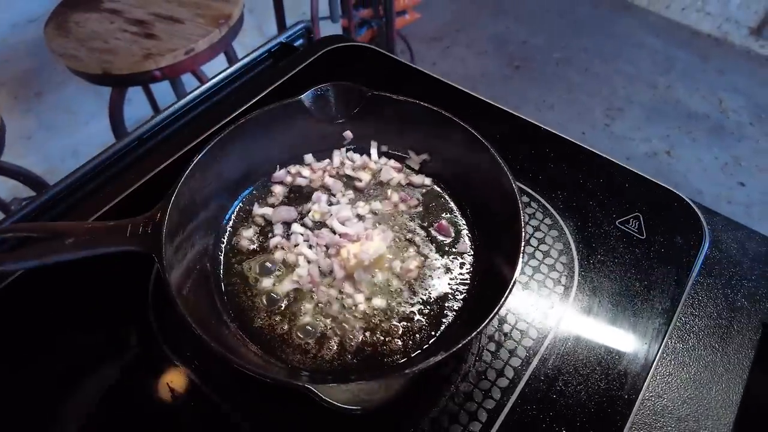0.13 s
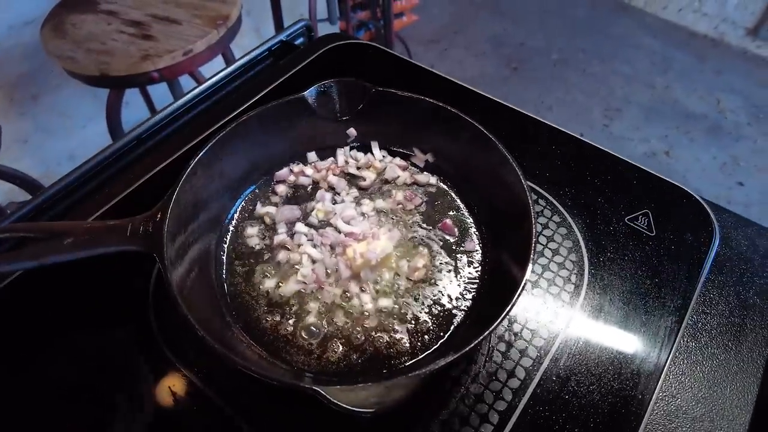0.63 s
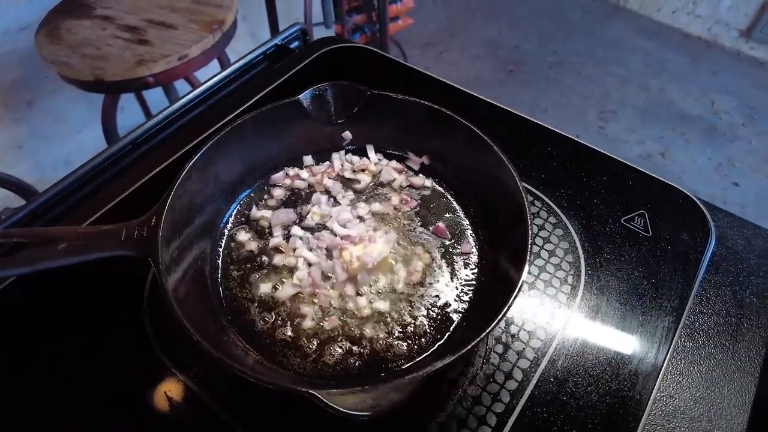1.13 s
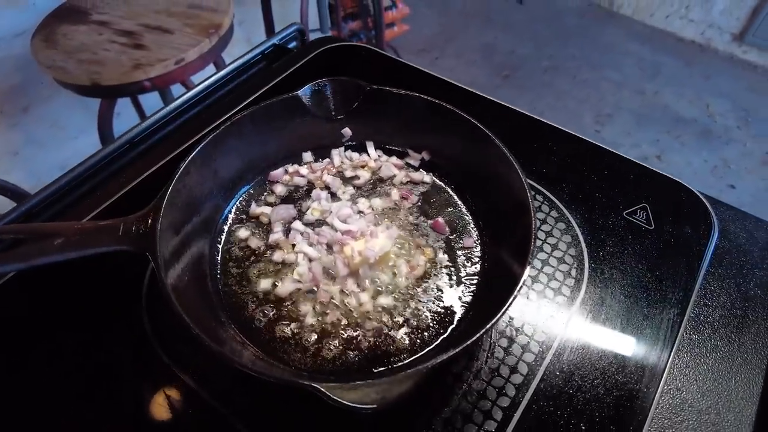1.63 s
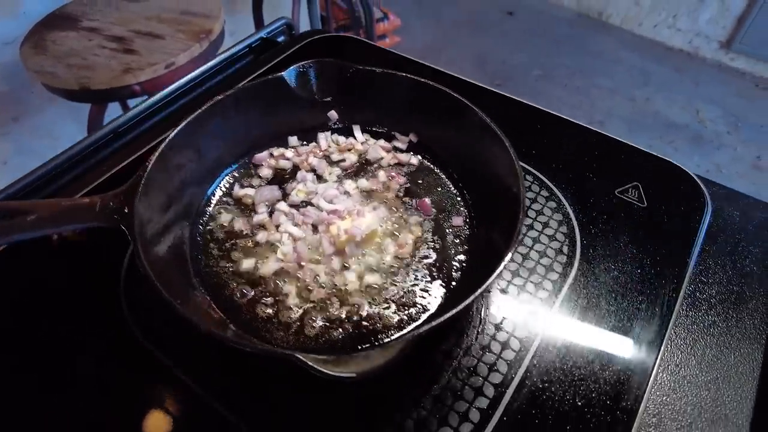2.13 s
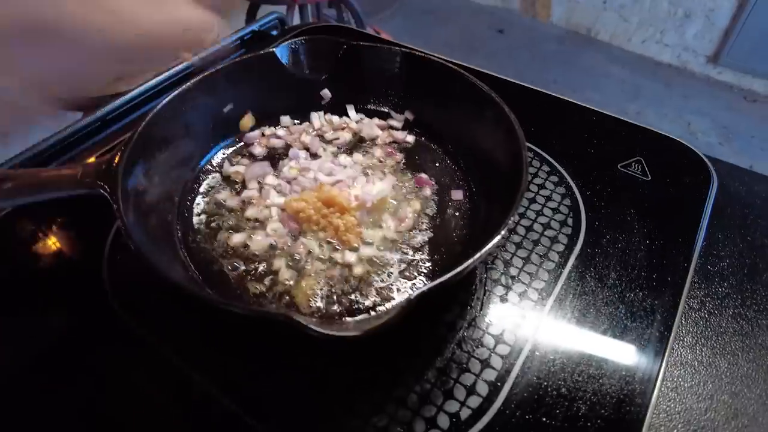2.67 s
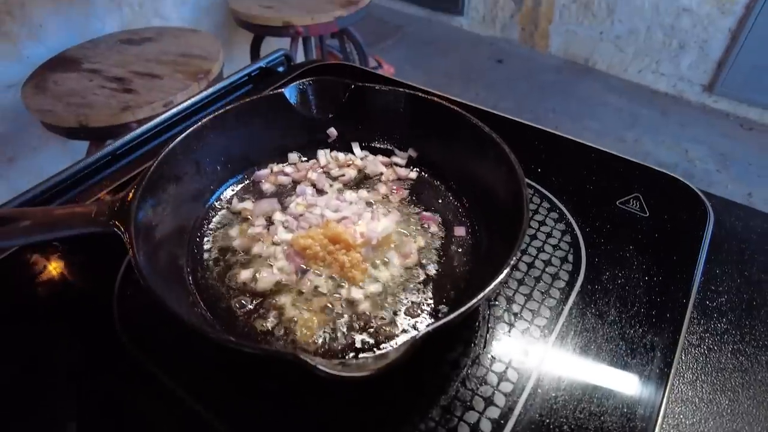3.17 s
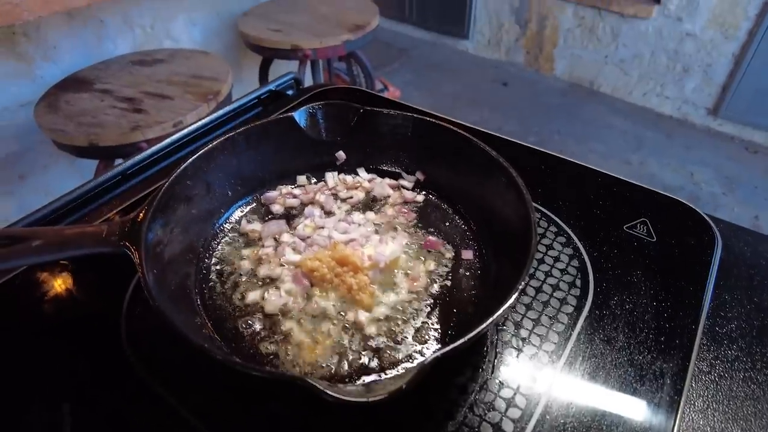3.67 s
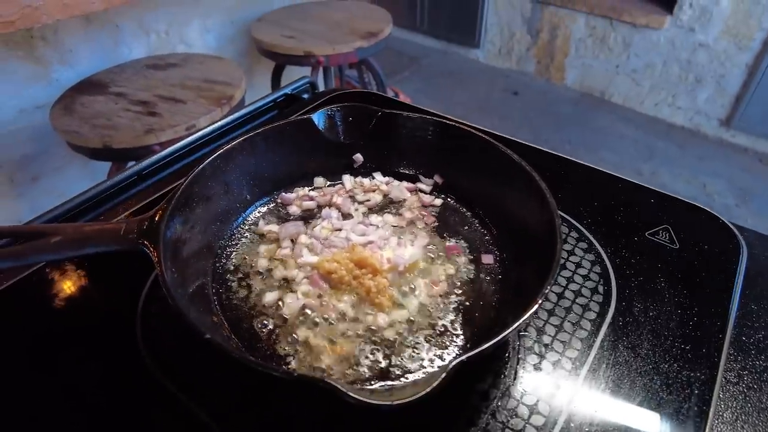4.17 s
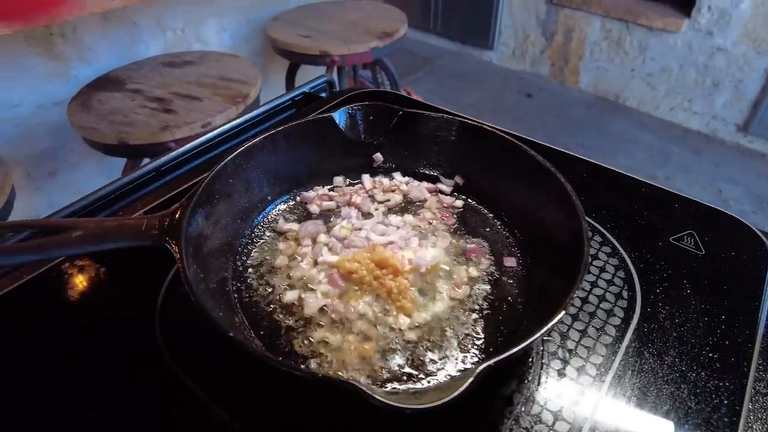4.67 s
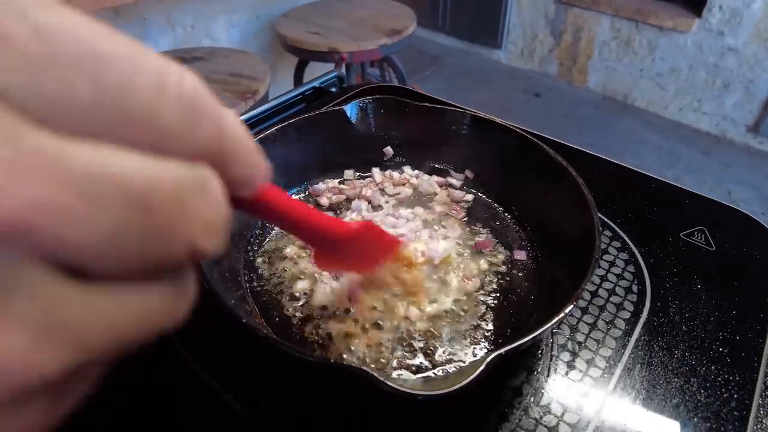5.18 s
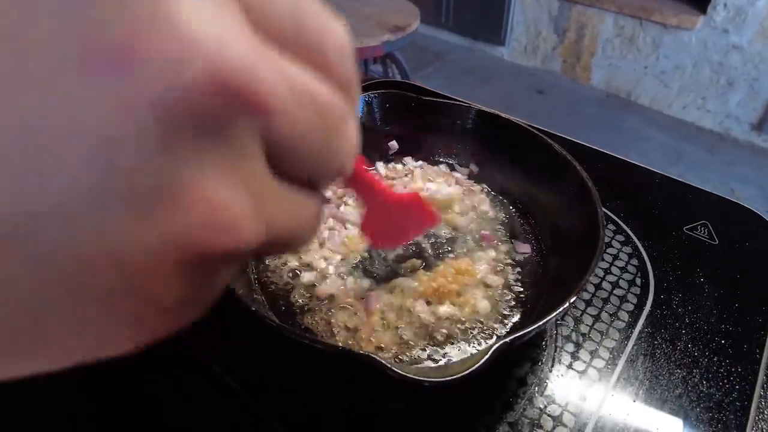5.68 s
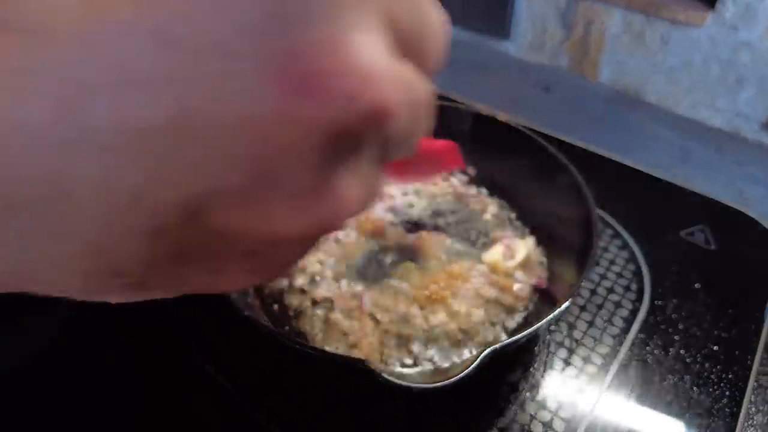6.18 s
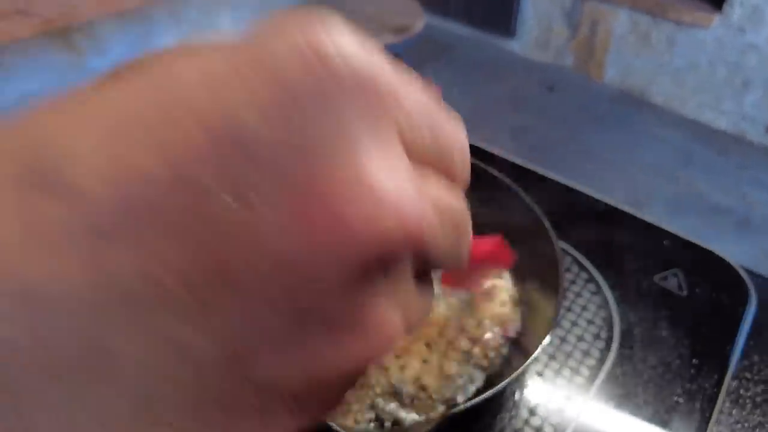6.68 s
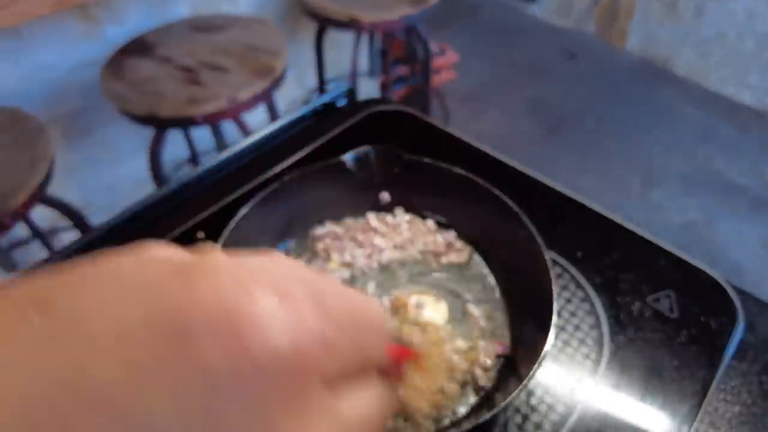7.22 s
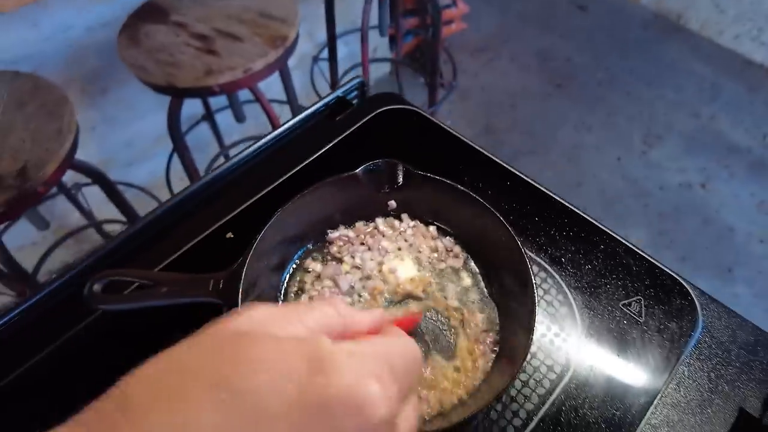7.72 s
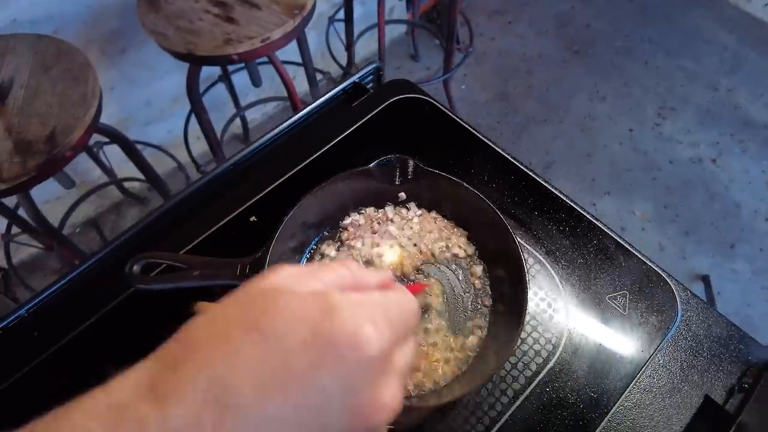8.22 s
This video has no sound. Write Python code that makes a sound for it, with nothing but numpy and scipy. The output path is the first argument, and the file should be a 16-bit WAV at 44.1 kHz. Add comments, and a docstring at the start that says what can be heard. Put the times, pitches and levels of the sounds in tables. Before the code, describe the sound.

Close frying in an iron skillet: fine bubbling, snaps and steady hiss, gentle at first, then much stronger from about three seconds. A small glass dish clinks as it is picked up early, taps lightly, then slides and clatters onto the counter mid-way. Loud spits pop throughout. A faint cooktop fan hums underneath. One nearby microphone, fairly dry, open space.

```python
"""At a kitchen cooktop, shallots and garlic fry in butter in an iron skillet, heard close by one microphone.
Steam bubbles ring, snap and hiss through the pan's resonances; the fizz swells with garlic and stirring,
and bigger bubbles spit. A small glass dish is picked up, slid and put down: knocks ring the counter and
the air under the dish, while clinks ring its glass. A fan makes noise and motor tones, and a faint far
tone sounds once."""
import sys
import numpy as np
from scipy import signal
from scipy.fft import rfft, irfft, next_fast_len
from scipy.io import wavfile
from scipy.ndimage import uniform_filter1d, map_coordinates

SR = 44100
rng = np.random.default_rng(int(sys.argv[2]) if len(sys.argv) > 2 else 0)


def elevation(decibels):
    """Turn decibel levels (scalar or array-like) into linear amplitude ratios."""
    levels = np.asarray(decibels, float)
    return 10 ** (levels / 20)


def unload_wav(signal):
    """Save mono or channel-first audio to the path in sys.argv[1] as 16-bit WAV at rate SR, clipped to [-1, 1]."""
    wavfile.write(
        sys.argv[1],
        SR,
        np.round(np.clip(np.atleast_2d(signal).T, -1, 1) * 32767).astype(np.int16),
    )


N = 367794
T = np.arange(N) / SR  # time of each sample, s

# ways the counter top rings, the first nine for the boom, the rest for the clack:
# usual pitch_hz, relative level_db, t60_s (time to die by 60 dB)
COUNTER_TOP = [(325, 10, 0.038), (534, 7.5, 0.022), (797, 4, 0.011), (986, 1.5, 0.017), (1077, -1, 0.021),
               (1250, 5.5, 0.0099), (1594, 11.5, 0.0059), (2350, 13.5, 0.0074), (2700, 4, 0.02),
               (3410, 1.5, 0.026), (3680, 10, 0.022), (4150, 5.5, 0.018), (5440, 6.5, 0.016),
               (6940, -1, 0.033), (7500, 6, 0.025), (7600, -1, 0.049)]
# the sliding dish; the air under it sings lower as the gap changes: time_s, pitch_hz, level_db
SLIDE_PATH = [(3.27, 1800, -56), (3.319, 1826, -54), (3.5, 1583, -46), (3.58, 1203, -52),
              (3.66, 1042, -45.5), (3.8, 1000, -48), (3.85, 1010, -68)]
SLIDE_START_S, SLIDE_END_S = SLIDE_PATH[0][0], SLIDE_PATH[-1][0]


def response(points, boosts=()):
    """Causal filter for (Hz, dB) points and (Hz, width, dB) humps."""
    hz = np.fft.rfftfreq(4096, 1 / SR) + 1
    f, db = np.transpose(points)
    db = np.interp(np.log(hz), np.log(f), db)
    db = db + sum(b / (1 + (2 * (hz - c) / w) ** 2) for c, w, b in boosts)
    # folding the cepstrum forward makes the filter act only after its input
    cepstrum = irfft(np.log(elevation(db)))
    cepstrum[1:2048] *= 2
    cepstrum[2049:] = 0
    return irfft(np.exp(rfft(cepstrum)))


def level(x, db):
    """Scale to an rms level."""
    return x * elevation(db) / np.sqrt(np.mean(x ** 2))


def walk(rate):
    """Random levels held 1 / rate s and slewed twice; spread near 1."""
    hold = int(SR / rate)
    steps = np.repeat(rng.standard_normal(N // hold + 1), hold)
    return 1.3 * uniform_filter1d(uniform_filter1d(steps, hold), hold)[:N]


def add(out, s, hz, db, t60, phase=0, rise_s=1e-4):
    """Add a dying sine from time s on; contact takes rise_s."""
    i = int(s * SR)
    t = T[:min(int(t60 * SR), N - i)]
    envelope = (1 - np.exp(-t / rise_s)) * elevation(db - 60 * t / t60)
    out[i:i + len(t)] += envelope * np.sin(2 * np.pi * hz * t + phase)


def bursts(per_s, spread_db):
    """Clicks at random moments with random sizes and signs; power 1."""
    where, size, sign = rng.random((int(per_s * N / SR), 3)).T
    sizes = elevation(-spread_db * np.log(size + .02)) * np.sign(sign - .5)
    return level(np.bincount((where * N).astype(int), sizes, N), 0)


def frying():
    """Bubbles of every size ring a few cycles; snaps and steam hiss join them, all coloured by the pan."""
    # colour of the fry: pitch_hz, relative level_db
    fry_colour = [(350, -23), (600, -22.5), (880, -9.5), (1310, -13), (2010, -10), (2570, -4), (3780, -2),
                  (5950, -2), (7600, -9.5), (8800, -7.5), (13400, -4.5), (16000, -9)]
    # hollow of the pan: pitch_hz, width_hz, shallots_boost_db, garlic_heap_boost_db, stirred_boost_db
    pan_hollow = [(970, 280, -4.5, 3.5, 0), (1813, 290, 6.5, 7.5, 9.5), (2564, 260, 2.5, -0.5, 4),
                  (3850, 330, 2.5, 4.5, 4.5), (4690, 230, 1, 5, -2), (5940, 430, 3, 1, 0.5),
                  (7620, 630, 2.5, 5, 4), (11070, 210, 4, 7.5, 3.5), (8470, 360, -3, -5, -2.5)]
    fizz_db = vigour()
    over_calm_db = fizz_db + 50  # the pan left alone fizzes at -50 dB
    # large bubbles follow the vigour steeply, fine spray weakly
    large_db = -60 + 1.237 * over_calm_db
    spray_db = -54 + 0.57 * over_calm_db
    garlic_s, garlic_rise_s, garlic_db = 1.8, 0.77, 2.5  # wet garlic adds large bubbles
    large_db = large_db + garlic_db * np.clip((T - garlic_s) / garlic_rise_s, 0, 1)
    surge_db = 0.52 * walk(25) + 0.74 * walk(90)  # bubbles come in flurries

    # fine spray snaps apart from the coarser spatter
    spatter, spray = bursts(300, spread_db=1.5), bursts(300, spread_db=24.0)
    snaps = uniform_filter1d(spatter, size=5) * 2 + spray - uniform_filter1d(spray, size=5)
    bubbles = 0
    for hz in 900 * 2 ** np.arange(0, 4.2, 1 / 6):
        pole = np.exp(-hz / (3.0 * SR))  # a handful of cycles
        ringing = [1, -2 * pole * np.cos(2 * np.pi * hz / SR), pole ** 2]
        swelling = [1, -1.6 * np.cos(2 * np.pi * hz / SR), .64]  # the ring swells in
        ring = signal.lfilter([1], ringing, bursts(.04 * hz, spread_db=3.5))
        ring = signal.lfilter([1], swelling, ring)
        bubbles = bubbles + level(ring, 10 * np.log10(hz)) * elevation(1.6 * walk(4.08))  # each size comes and goes
    busy_db = fizz_db + 49.0  # a fierce fry blurs single bursts into hiss
    hiss = level(rng.standard_normal(N), -2.25) * elevation(0.46 * busy_db)
    raw = level(bubbles, 0) + level(snaps, -4.5) + hiss
    raw = raw / np.sqrt(uniform_filter1d(raw ** 2, SR // 2))
    lag = SR * (0.00086 + .00006 * walk(1.456))  # echo off the pan wall; the microphone sways
    raw = raw + 0.12 * np.interp(np.arange(N) - lag, np.arange(N), raw)

    # split into large bubbles, middle fizz and fine spray
    size = next_fast_len(N)
    spectrum = rfft(raw * elevation(surge_db * (1 - 0.057 * busy_db)), size)
    hz = np.fft.rfftfreq(size, 1 / SR)
    low = 1 / (1 + (hz / 3400) ** 6)
    high = 1 / (1 + (8300 / (hz + 1)) ** 12)
    bands = [(1 - low - high, fizz_db), (low, large_db), (high, spray_db)]
    # the load of the pan changes: garlic heaped, then stirred; each change takes reshape_s
    heaped_s, stirred_s, reshape_s = 3.36, 5.63, 0.57
    heaped, stirred = (np.clip((T - s) / reshape_s + .5, 0, 1) for s in (heaped_s, stirred_s))
    out = 0
    for k, share_now in enumerate((1 - heaped, heaped - stirred, stirred)):
        humps = [(c, w, boost[k]) for c, w, *boost in pan_hollow]
        coloured = spectrum * rfft(response(fry_colour, humps), size)
        for band, band_db in bands:
            part = irfft(coloured * band, size)[:N]
            out = out + share_now * level(part, 0) * elevation(band_db)
    return out


def vigour():
    """Level of the fizz in dB, sample by sample, as the frying grows and calms."""
    # vigour of the fry: time_s, level_db
    fry_vigour = [(0, -49.5), (.9, -51), (1.4, -50), (1.8, -51.5), (2.35, -51.5), (2.55, -49), (2.83, -47),
                  (3.3, -42), (3.7, -39.5), (4.4, -42), (4.7, -43.5), (5.35, -44), (5.75, -40.5),
                  (6.7, -40), (7.2, -41), (7.34, -42.5), (7.375, -38), (7.7, -37), (7.95, -36), (8.34, -40)]
    return np.interp(T, *np.transpose(fry_vigour))


def spits():
    """A big bubble bursts: a short ring, a deeper plop and a millisecond puff of spray."""
    # loud spits: start_s, strength_db, pitch_hz, spray_db
    loud_spits = [(0.0219, -13, 5700, -23.5), (2.612, -24.5, 2500, -40), (2.8953, -23, 4100, -41),
                  (2.9196, -21.5, 4500, -46.5), (3.1185, -17, 5940, -51), (3.3338, -18, 4260, -28),
                  (3.4654, -20, 4130, -31), (3.6152, -18, 5700, -45), (3.6716, -15.5, 4150, -40),
                  (4.2616, -12, 4720, -29), (5.3869, -13, 3880, -24), (5.3882, -20.5, 2550, -28),
                  (6.0474, -19, 3750, -30), (6.1774, -26, 5500, -24), (6.271, -20.5, 3820, -26),
                  (6.4866, -18, 4950, -42.5), (7.0372, -16, 4700, -49), (7.0992, -16, 4650, -49),
                  (7.17, -22, 2900, -42), (7.1962, -9, 4560, -31), (7.5976, -18, 3580, -40.5)]
    out = np.zeros(N)
    t = T[:SR // 200]
    # 130 small spits at random moments follow the fizz
    when, size, pitch, wet = rng.random((130, 4)).T
    s = when * (N / SR - .01)
    fizz_db = vigour()[(s * SR).astype(int)]
    low_hz, high_hz = 2470, 6200
    small_hz = low_hz * (high_hz / low_hz) ** pitch
    small = zip(s, fizz_db + 12.5 - 8 * size, small_hz, fizz_db + 3 + 9.7 * (wet - .5))
    rows = loud_spits + list(small)
    for (s, db, hz, spray_db), noise in zip(rows, rng.standard_normal((len(rows), len(t) + 1))):
        dry = spray_db - db < -24  # a spit with little spray rings longer
        add(out, s, hz, db - 3 * dry, (30 if dry else 12) / hz, rise_s=.0003)
        add(out, s, 0.78 * hz, db - 8 * dry, 6 / hz, rise_s=.00015)
        i = int(s * SR)
        puff = (t / 0.00084) * np.exp(1 - t / 0.00047)
        out[i:i + len(t)] += elevation(spray_db) * np.diff(noise) * puff
    return signal.sosfilt(signal.butter(2, 600, "high", fs=SR, output="sos"), out)  # too small to move bass


def counter():
    """Each knock rings the counter and rebounds weaker, with crunching grit; the dish lands flat with a thud."""
    # knocks on the counter: start_s, strength_db, pitch_hz, clack_db
    knocks = [(0.22, -11.5, 1710, -23), (0.228, -14, 1660, -42), (0.3327, -27.5, 1390, -36),
              (0.389, -31, 1300, -43), (0.4114, -17.5, 1080, -29.5), (0.4122, -19.5, 1704, -52),
              (0.4179, -24.5, 898, -54), (0.452, -28.5, 1550, -39), (.49, -42, 604, -62),
              (1.349, -38, 1370, -45), (1.3522, -28.5, 1410, -39), (1.5597, -22.5, 1340, -42),
              (1.567, -26.5, 1300, -50), (3.235, -20, 1740, -31), (3.245, -20, 1740, -32),
              (3.497, -24, 1610, -45), (3.514, -32, 1600, -35), (3.5255, -30, 1570, -30),
              (3.531, -9.5, 1560, -17.5), (3.5358, -23, 1490, -28), (3.54, -22, 1500, -33),
              (3.5541, -10, 1330, -14.5), (3.561, -13, 1270, -19.5), (3.565, -17, 1290, -16.5),
              (3.567, -22, 1250, -23.5), (3.573, -19, 1160, -28), (3.6901, -17, 1044, -31),
              (3.6944, -10.5, 1008, -27), (3.705, -19, 990, -42), (3.71, -20, 1000, -32),
              (3.73, -15, 990, -29), (3.737, -9, 1170, -25.5), (3.7462, -13, 1060, -31),
              (3.75, -19, 950, -24.5), (3.7539, -28, 900, -23.5), (3.762, -18, 936, -29),
              (3.791, -26, 1016, -40), (4.095, -31.5, 1030, -56)]
    rebound_s, rebound_scatter = 0.006, 0.1304  # usual gap, and its random spread as a share
    out, grit = np.zeros((2, N))
    lucks = rng.standard_normal((len(knocks), 4, len(COUNTER_TOP) + 1, 3))
    for (s, db, pitch_hz, clack_db), luck in zip(knocks, lucks):
        # a dish set down gently before the slide chatters on
        chatter = db < -27.5 and s < SLIDE_START_S
        for n in range(4 if chatter else 2):
            touch_s = s + n * rebound_s * (1 + rebound_scatter * luck[n, -1, 0])
            loss_db = n * (4 if chatter else 11.5)
            for ring in knock(touch_s, db - loss_db, pitch_hz, clack_db - loss_db, luck[n], chatter):
                add(out, *ring)
            # at 0 Hz this is a plain dying envelope for the grit
            add(grit, touch_s, 0, clack_db + 2 - loss_db, t60=0.016, phase=np.pi / 2)
    grit_band = signal.butter(2, (3060, 8600), "band", fs=SR, output="sos")
    out += signal.sosfilt(grit_band, grit * bursts(7100, spread_db=-3.5))
    add(out, 3.554, hz=360, db=-12, t60=0.0081)  # the dish lands flat
    return signal.sosfilt(signal.butter(3, 120, "high", fs=SR, output="sos"), out)  # no bass from small contacts


def knock(s, db, pitch_hz, clack_db, luck, chatter):
    """Dying sines of one contact: low counter modes near its pitch, a higher clack, an air pocket and a tick."""
    if SLIDE_START_S < s < SLIDE_END_S:
        boom_db, overtone_db, glassy_db, slope, cycles = -0.5, -2, 0.5, 1.0, 25
    else:
        boom_db, overtone_db, glassy_db, slope, cycles = 1, 7, -10, .7, 40
    pocket_t60 = (12 if chatter else cycles) / pitch_hz
    rings = []
    for k, (hz, mode_db, t60) in enumerate(COUNTER_TOP):
        if k < 9:
            # the boom falls away above and below the pitch of the knock
            octaves = np.log2(hz / pitch_hz)
            blow_db = db + boom_db - 11.0 - slope * max(18.5 * octaves, -19 * octaves)
            scatter = .015
        else:
            blow_db = clack_db - 6.5 + glassy_db * (hz > 4000)
            scatter = .03
        mode_hz = hz * (1 + scatter * luck[k, 0])
        rings.append((s, mode_hz, blow_db + mode_db + 2.5 * luck[k, 1], t60, np.pi * luck[k, 2], .0003))
    pocket = (s, pitch_hz, db - 3.5, pocket_t60, 0, .0003)  # the air pocket under the dish
    overtone = (s, 1.66 * pitch_hz, db + overtone_db - 19, 1.3 * pocket_t60, 0, .0003)
    tick = (s, 11000, clack_db - 5, .002)
    return rings + [pocket, overtone, tick]


def dish():
    """Three glass modes, each a close pair that beats; hand and counter alter how they ring."""
    # clinks: start_s, first_mode_db, second_mode_db, third_mode_db, t60_s (fingers shorten it)
    clinks = [(0.221, -23.5, -42, -61, 0.38), (0.334, -28, -34, -61, 0.13), (0.395, -37, -50, -62, 0.043),
              (.452, -43, -49.5, -66, 0.05), (1.353, -36, -37, -56, 0.025), (1.434, -33.5, -60, -68, 0.026),
              (1.484, -42, -60.5, -56, 0.075), (3.234, -14, -33, -57, 0.042),
              (3.2453, -20, -37, -57, 0.056), (3.531, -25, -36, -16.5, 0.071),
              (3.538, -44, -21, -30, 0.035), (3.554, -34, -16, -23, 0.03), (3.567, -27, -27, -40, 0.041),
              (3.6954, -42, -29, -49, .03), (3.7303, -39, -23.5, -28, .03), (3.752, -24, -18, -28, 0.02),
              (3.761, -34, -32, -35, 0.06)]
    # glass modes before any shift: pitch_hz, twin_pitch_hz
    glass_modes = [(2896, 2912), (7315, 7345), (13165, 13190)]
    bend_s, bend_width_s, bend = .297, .012, .018  # a touch briefly bends the ring up (share of pitch)
    out = np.zeros(N)
    touched_db = 7 * np.clip((T - bend_s) / bend_width_s + 1.5, 0, 1)
    for (s, *mode_db, t60), luck in zip(clinks, rng.standard_normal(len(clinks))):
        for (hz, twin_hz), db, weaker_db in zip(glass_modes, mode_db, (14, 5, 8)):
            grip = 1 + 1.7 / (hz * t60) * (hz < 4000)  # a firm grip stiffens the lowest mode
            # pressed on the counter, the second mode shifts
            grip += .02 * luck * (s > SLIDE_START_S) * (4000 < hz < 10000)
            add(out, s, hz * grip, db, t60, rise_s=0.00017)
            add(out, s, twin_hz * grip, db - weaker_db, t60, rise_s=0.00048)
        if s < bend_s:  # a touch damps this ring, the next contact stifles it by 600 dB per s
            out *= elevation(-touched_db - 600 * np.clip(T - clinks[1][0], 0, 1))
    lag = SR * .00003 * walk(25)  # the hand swings the dish: pitch and level waver
    lag = lag - SR * bend * bend_width_s * (np.tanh((T - bend_s) / bend_width_s) - 1)
    return map_coordinates(out, [np.arange(N) - lag], order=3) * elevation(1.2 * walk(40))


def slide():
    """Rubbing noise in one narrow resonance, whose pitch mostly falls."""
    s, hz, db = np.transpose(SLIDE_PATH)
    rub = walk(500) * elevation(1.5 * walk(50))
    loudness = elevation(np.interp(T, s, db, -120, -120))
    phase = 2 * np.pi * np.cumsum(np.interp(T, s, hz)) / SR
    return rub * loudness * np.sqrt(2) * np.sin(phase)


def fan():
    """Air rush of the cooktop fan with wavering motor tones, and one faint far tone."""
    # colour of the air rush: pitch_hz, relative level_db
    rush_colour = [(25, -34), (49, -15.5), (95, -16), (200, -9), (601, -12), (850, -14.5), (1730, -19),
                   (2500, -34), (3250, -30), (5500, -120)]
    # motor tones before wavering: pitch_hz, level_db
    motor_tones = [(62, -75), (119, -71), (242, -70), (317, -67.5), (1320, -72), (1701, -68.5)]
    rush = signal.fftconvolve(rng.standard_normal(N), response(rush_colour))[:N]
    rush = level(rush * elevation(.8 * walk(2.82)), -57)
    tones = 0
    for hz, db in motor_tones:
        wave = np.sin(2 * np.pi * hz * T + 1.0 * walk(12))
        tones = tones + np.sqrt(2) * elevation(db + 1.9 * walk(6.7)) * wave
    start_s, end_s = 7.13, 7.6
    fade_db = -59.5 - 9 * (T - start_s) + 2.5 * walk(16)
    sounding = (T > start_s) * (T < end_s)
    far_tone = np.sqrt(2) * elevation(fade_db) * sounding * np.sin(2 * np.pi * 428 * T + 1.3 * walk(30))
    return rush + tones + far_tone


def scene():
    """Knocks with a short scatter off the walls over the frying, the same in both channels."""
    near = counter() + dish()
    t = T[:SR // 8]
    walls_db, walls_t60_s = -42, .08
    walls = rng.standard_normal(len(t)) * elevation(walls_db - 60 * t / walls_t60_s) * (t > .002)
    mono = near + signal.fftconvolve(near, walls)[:N] + slide() + spits() + frying() + fan()
    return np.array([mono, mono])


def band_limit(x):
    """A steep low-pass at the top of the band."""
    return signal.sosfilt(signal.butter(12, 16610, fs=SR, output="sos"), x)


def record(dry):
    """The input stage rounds the loudest peaks towards a ceiling, then the top treble is cut."""
    ceiling, top_hz = .6, 15720
    rounded = ceiling * np.tanh(dry / ceiling)
    mix = signal.sosfilt(signal.ellip(10, .5, 60, top_hz, fs=SR, output="sos"), rounded)
    return band_limit(mix)


dry = scene()
out = record(dry)
unload_wav(out)
```